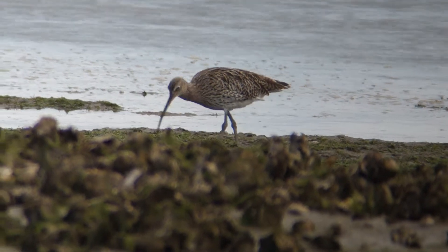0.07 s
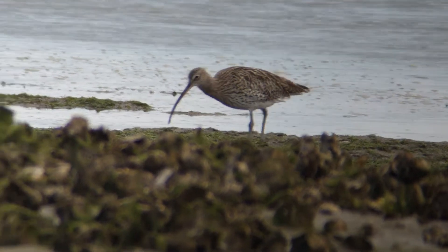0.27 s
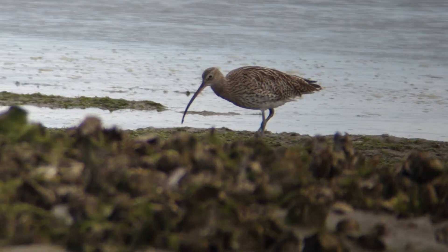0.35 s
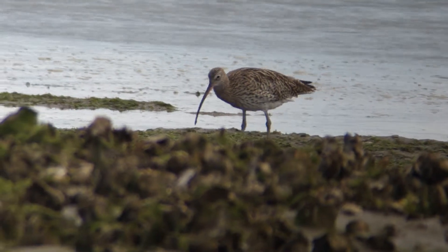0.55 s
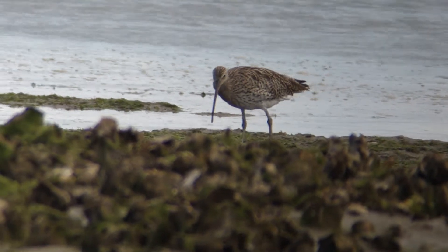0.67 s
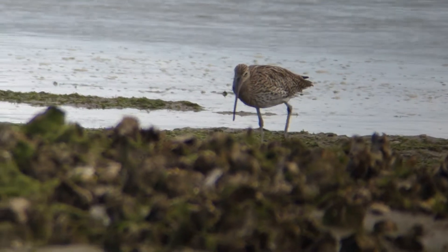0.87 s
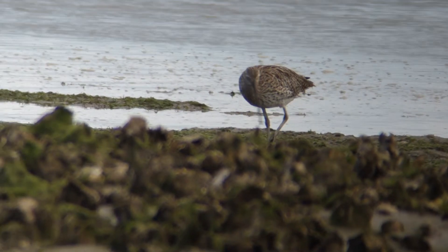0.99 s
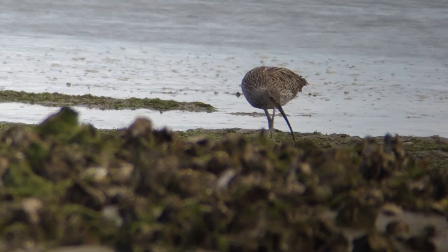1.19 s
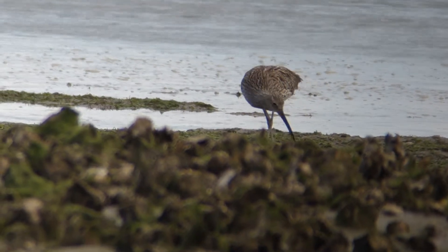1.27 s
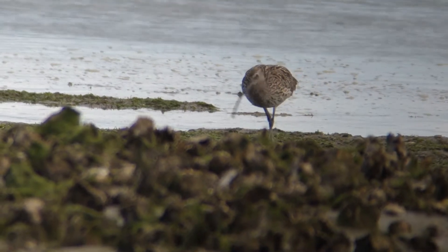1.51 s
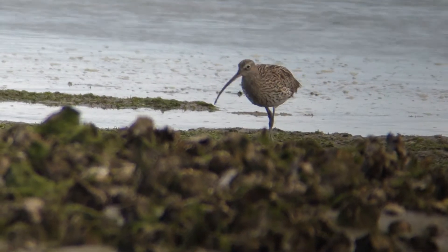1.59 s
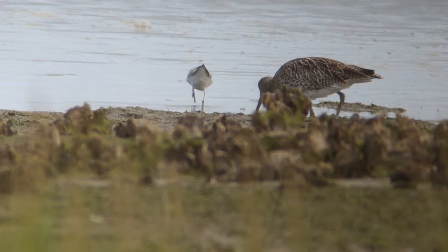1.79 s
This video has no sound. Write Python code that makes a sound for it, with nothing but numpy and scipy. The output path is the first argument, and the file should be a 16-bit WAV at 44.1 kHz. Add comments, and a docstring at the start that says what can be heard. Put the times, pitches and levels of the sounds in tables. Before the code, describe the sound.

A low outdoor rumble of wind and far traffic, briefly jolted by a dull bump.

```python
"""A muddy shore in light wind, with a steady low rumble and faint hiss under everything.
Tyres roar on a distant road, and the roar brightens as a vehicle nears.
A dull bump jolts the microphone and leaves a short low shudder; a smaller one follows a second later.
The bumps are low tones that die away quickly; all the other sounds are shaped noise."""
import sys
import numpy as np
from scipy.fft import rfft, irfft, next_fast_len
from scipy.io import wavfile
from scipy.ndimage import map_coordinates

SR = 44100
rng = np.random.default_rng(int(sys.argv[2]) if len(sys.argv) > 2 else 0)


def dump(signal):
    """Clip the signal to [-1, 1] and save it as 16-bit WAV at the path in sys.argv[1]."""
    limited = np.clip(np.atleast_2d(signal).T, -1, 1)
    pcm = np.round(limited * 32767).astype(np.int16)
    wavfile.write(sys.argv[1], SR, pcm)


N = 81585

# how alike left and right sound in the open air: (frequency [Hz], likeness [1 = same, 0 = unrelated])
AIR_LIKENESS = [(60, 0.99), (240, 1), (400, 0.9), (620, 0.84), (1000, 0.94), (1600, 0.74), (2500, 0),
                (4000, 0)]


def amp(db):
    """Turn decibels into a number to multiply a sound by."""
    return 10 ** (np.asarray(db) / 20)


def along(points, hz):
    """Read a (frequency, value) table at hz, joining its points on a scale of octaves."""
    frequencies, values = np.transpose(points)
    return np.interp(np.log(hz + 1), np.log(frequencies + 1), values)


def curve(points):
    """Join (time, value) points with straight lines, giving one value per sample."""
    return np.interp(np.arange(N) / SR, *np.transpose(points))


def wobble(per_second):
    """A smooth curve through random values, per_second of them each second."""
    return map_coordinates(rng.standard_normal(200), [np.arange(N) * per_second / SR], mode="wrap")


def filtered(sound, gain_at):
    """Turn each frequency of a sound up or down by gain_at(hz)."""
    size = next_fast_len(N + 8192)
    gains = gain_at(np.fft.rfftfreq(size, 1 / SR))
    return irfft(rfft(sound, size) * gains, size)[..., :N]


def stereo_noise(colour, likeness):
    """Left and right noise of average power 1; colour(hz) gives each frequency's relative level in dB."""
    def gains(hz):
        spread = np.arccos(np.clip(along(likeness, hz), -1, 1)) / 2
        return amp(colour(hz)) * [np.cos(spread), np.sin(spread)]

    middle, side = filtered(rng.standard_normal((2, N)), gains)
    noise = np.array([middle + side, middle - side])
    return noise / np.sqrt(np.mean(noise ** 2) + 1e-20)


def hiss():
    """A faint, smooth hiss, almost unrelated left and right, that swells a little midway."""
    # tone of the hiss: (frequency [Hz], relative level [dB])
    colour = [(500, -15), (2000, -6.5), (3200, 2), (3600, -3.5), (4150, 5), (4700, -1.5), (7000, -2.5),
              (10800, -7)]
    # loudness of the hiss: (time [s], level [dB])
    loudness = [(0, -70), (.6, -70), (.9, -69), (1.5, -70.5), (1.85, -70.5)]
    # how alike its two sides are: (frequency [Hz], likeness [1 = same, 0 = unrelated])
    likeness = [(2000, 0.058), (10000, -0.033)]
    return amp(curve(loudness)) * stereo_noise(lambda hz: along(colour, hz), likeness)


def rumble():
    """Wind and far engines make a low, slightly lumpy rumble."""
    # tone of the rumble: (frequency [Hz], relative level [dB])
    colour = [(12, -42), (25, -8.5), (50, -5.5), (75, -0.5), (100, -0.5), (170, -3), (225, -2.5),
              (275, -6.5), (340, -15.5), (420, -22.5), (600, -36.5), (1500, -56)]
    # loudness of the rumble: (time [s], level [dB])
    loudness = [(0, -44), (.5, -44), (1.08, -43), (1.22, -46), (1.85, -47)]
    level_db = curve(loudness) + 0.37 * wobble(per_second=13.8)
    return amp(level_db) * stereo_noise(lambda hz: along(colour, hz), AIR_LIKENESS)


def road():
    """Tyres roar steadily far away; each passing vehicle swells and fades in its own range of pitch."""
    # tone of the tyre roar: (frequency [Hz], relative level [dB])
    colour = [(200, -26.5), (450, -15), (600, -16), (800, -6), (1020, 0), (1170, -2), (1350, -6.5),
              (1650, -13.5), (2000, -18), (2300, -18.5), (2700, -27), (3600, -32), (8000, -67.5)]
    # loudness of the tyre roar: (time [s], level [dB])
    loudness = [(0, -50.5), (.07, -49.5), (.14, -51.5), (.4, -51), (.66, -51), (.85, -51.5), (1.2, -50.5),
                (1.45, -49.5), (1.85, -49.5)]
    # passing vehicles: (loudest moment [s], level [dB], centre pitch [Hz], time to fade to half [s])
    vehicles = [(.03, -52.5, 777, 0.24), (0.502, -54, 745, 0.082), (.97, -59, 828, 0.17),
                (1.755, -50.5, 1535, 0.17)]
    half_width_octaves, steepness = 0.33, 3.2
    t = np.arange(N) / SR
    level_db = curve(loudness) + 0.36 * wobble(per_second=10.15)
    roar = amp(level_db) * stereo_noise(lambda hz: along(colour, hz), AIR_LIKENESS)
    for loudest_s, db, centre_hz, fade_s in vehicles:
        def band_db(hz):
            octaves_away = np.abs(np.log2((hz + 1) / centre_hz))
            return -20 * np.log10(1 + (octaves_away / half_width_octaves) ** steepness)

        swell = amp(db) / (1 + ((t - loudest_s) / fade_s) ** 2)
        roar += swell * stereo_noise(band_db, AIR_LIKENESS)
    return roar


def microphone_bumps():
    """Each jolt is a soft, low swing that dies away fast; a noisy shudder surrounds the big bump."""
    # jolts to the microphone: (start [s], level [dB], pitch [Hz], rise time [s])
    jolts = [(.469, -29, 135, 0.0044), (0.5001, -19.5, 110.8, .006), (0.5096, -29.5, 319, 0.0055),
             (0.5199, -23.5, 206, 0.004), (0.5234, -27.5, 90.6, 0.0071), (.636, -30.5, 89.5, 0.0059),
             (1.573, -31, 100, 0.0043)]
    # tone of the shudder: (frequency [Hz], relative level [dB])
    colour = [(12, -35), (30, -12.5), (70, 0.5), (110, -6), (170, -10), (320, -17.5), (420, -35.5),
              (700, -44), (2000, -93)]
    # loudness of the shudder: (time [s], level [dB])
    loudness = [(.38, -66), (.45, -44), (.49, -42), (.52, -37), (.56, -44), (.65, -42), (.72, -45),
                (.9, -63)]
    right_lead_s, lean_db = 0.00063, 1.24  # the right side hears a jolt first, the left hears it louder
    t = np.arange(N) / SR
    lead_s = np.array([[-.5], [.5]]) * right_lead_s
    swings = np.zeros((2, N))
    for start_s, db, pitch_hz, rise_s in jolts:
        age = np.maximum(t - start_s + lead_s, 0)
        rise_and_fall = (age / rise_s * np.exp(1 - age / rise_s)) ** 2
        swings += amp(db) * rise_and_fall * np.sin(2 * np.pi * pitch_hz * age)
    shudder = amp(curve(loudness)) * stereo_noise(lambda hz: along(colour, hz), AIR_LIKENESS)
    return (swings + shudder) * amp([[lean_db], [-lean_db]])


def scene():
    """All the sounds of the shore together."""
    return rumble() + road() + microphone_bumps() + hiss()


def record(dry):
    """The camera keeps no sound above 11000 Hz."""
    return filtered(dry, lambda hz: hz < 11000)


dry = scene()
out = record(dry)
dump(out)
```